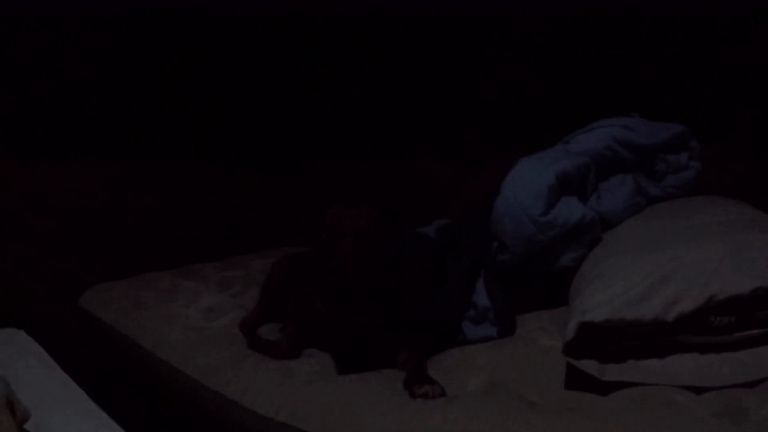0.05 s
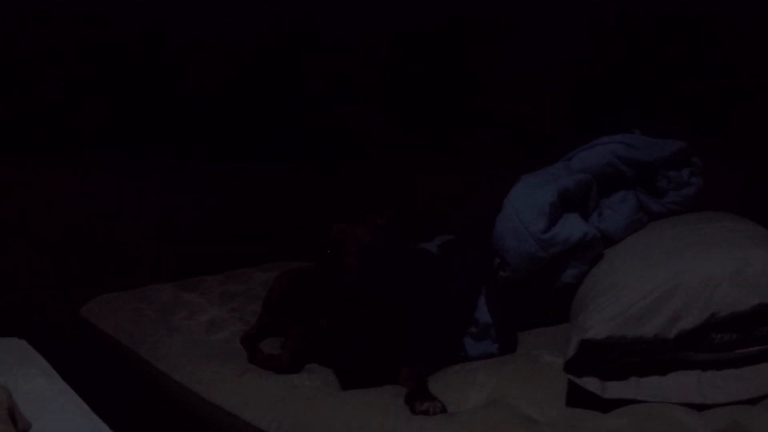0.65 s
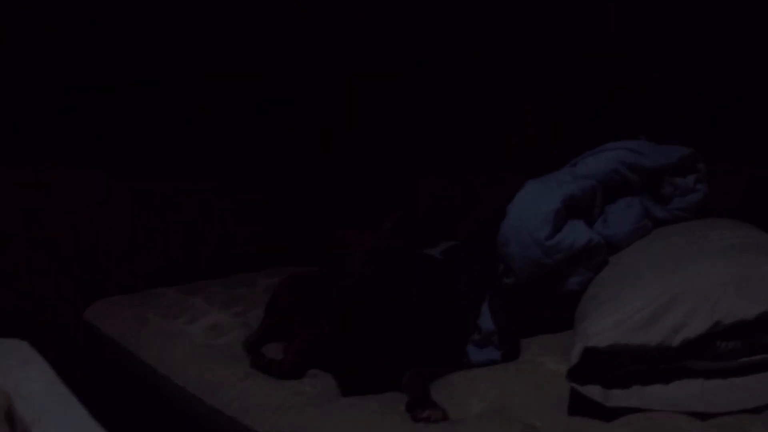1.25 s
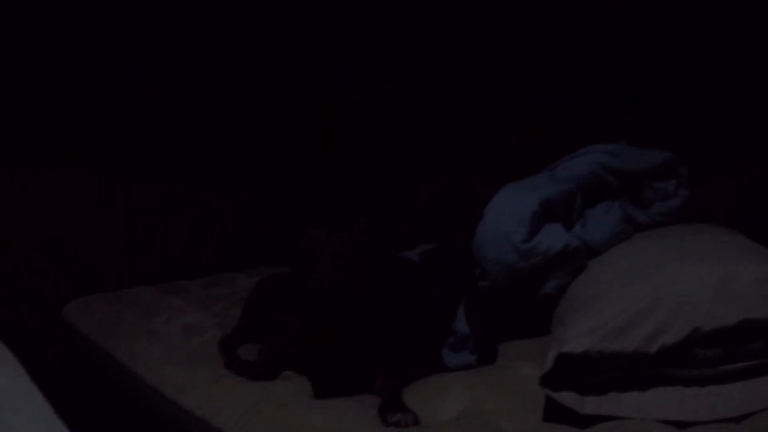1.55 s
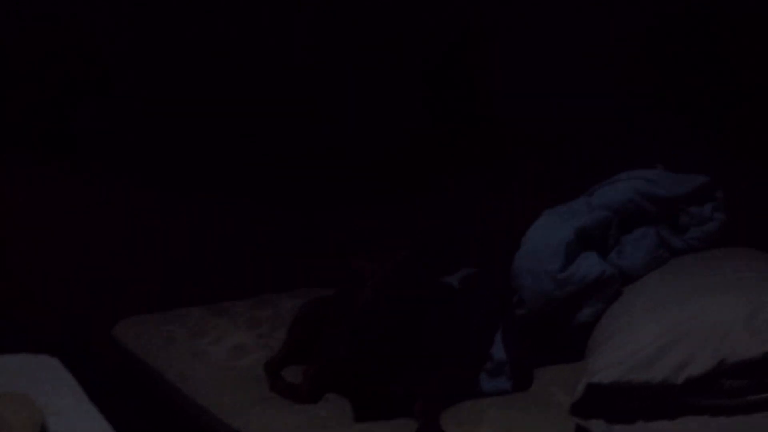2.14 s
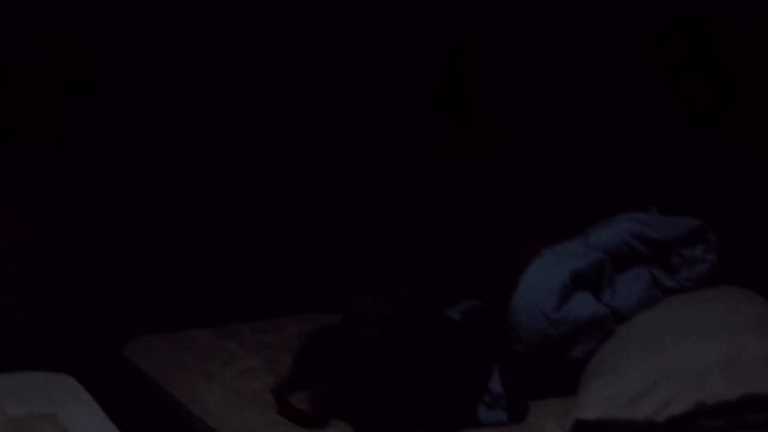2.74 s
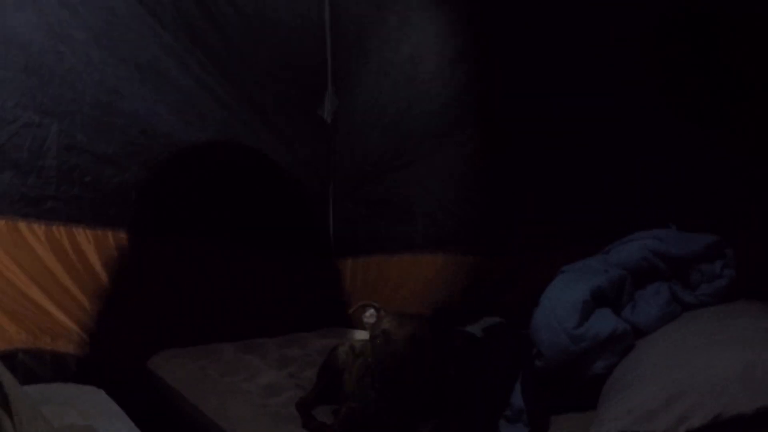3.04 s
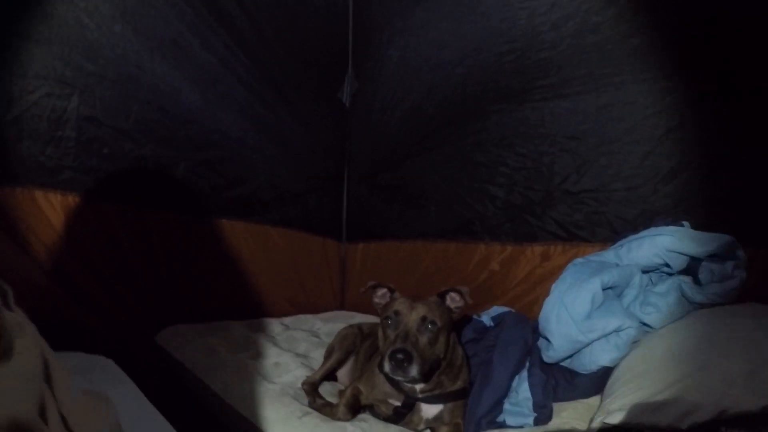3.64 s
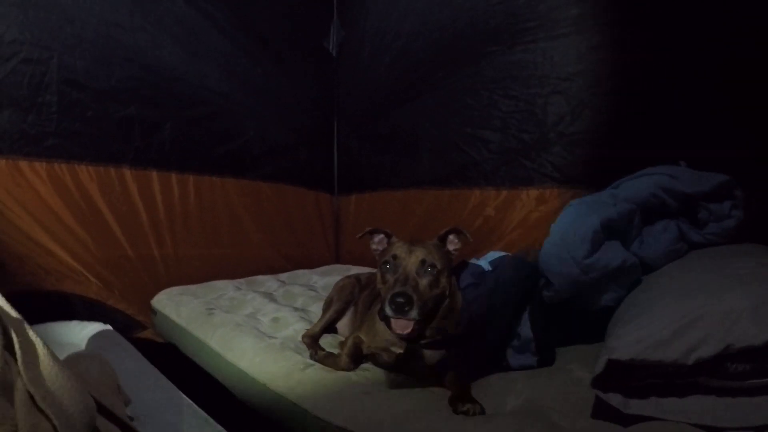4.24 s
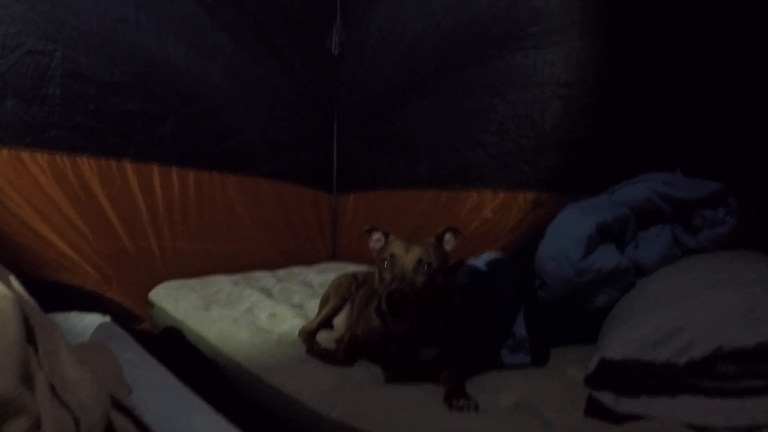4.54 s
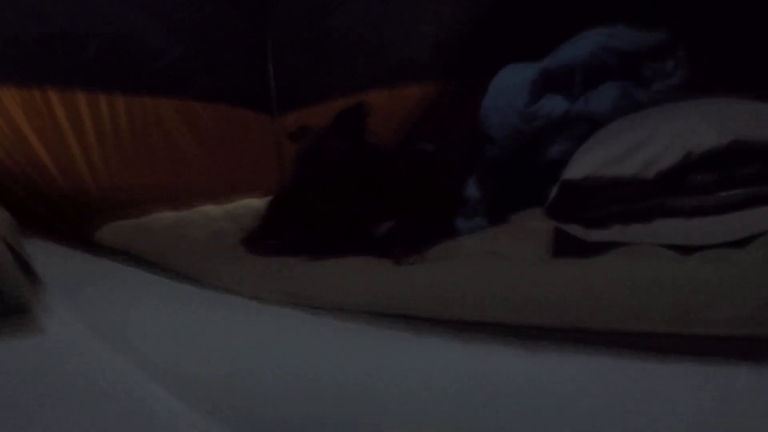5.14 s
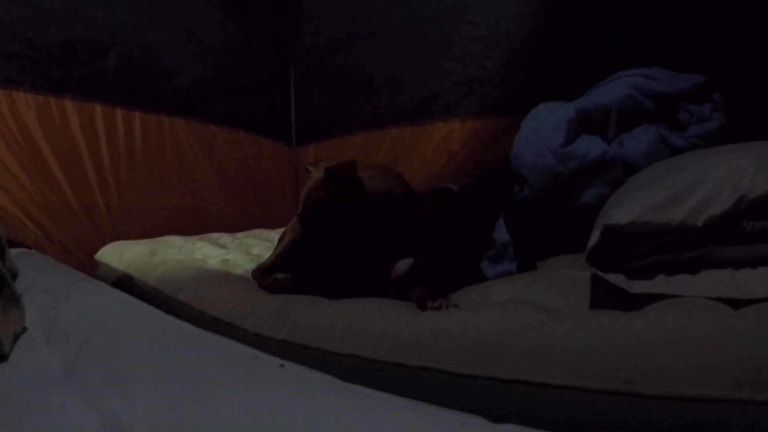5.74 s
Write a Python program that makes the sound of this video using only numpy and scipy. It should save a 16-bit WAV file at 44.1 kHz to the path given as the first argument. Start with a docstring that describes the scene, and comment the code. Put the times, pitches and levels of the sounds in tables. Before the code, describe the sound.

Inside a tent, steady rain drums on the roof, many small drops mixed with sharp, close taps from bigger ones. The cloth gives occasional dull flaps and faint swishes. In the second half the sound opens out in stereo and the microphone is shifted in the hand, giving two clusters of loud hollow knocks, scraping and low rumbling. The rain continues to the end.

```python
"""Rain drums on a tent at night, heard from inside through a hand-held microphone.
Each drop is an impact on a membrane: countless small ones patter, heavy ones smack close by, spray hisses.
The cloth flaps and swishes, and moving air rumbles underneath. In the second half the stereo image opens,
and fingers knock and creak on the microphone's case, exciting its modes by impact and stick-slip friction."""
import sys
import numpy as np
from scipy import signal
from scipy.fft import rfft, irfft
from scipy.io import wavfile
from scipy.ndimage import uniform_filter1d, minimum_filter1d

SR = 44100
rng = np.random.default_rng(int(sys.argv[2]) if len(sys.argv) > 2 else 0)


def waveform_to_disk(signal):
    """Save audio, clipped to [-1, 1], as 16-bit WAV at the path in sys.argv[1]."""
    frames = np.transpose(np.atleast_2d(signal))
    scaled = np.clip(frames, -1, 1) * 32767
    samples = np.round(scaled).astype(np.int16)
    wavfile.write(sys.argv[1], SR, samples)


N = 263718
TIME = np.arange(N) / SR


# gusts and lulls in the shower: middle t/s, duration/s, level change/dB
GUSTS = [(0.62, 0.23, 3), (1.11, 0.21, 5), (1.9, 0.33, -2.5), (2.05, 0.079, 4.5), (2.74, 0.44, -3),
         (3.245, 0.13, -6.5), (3.83, 0.28, 6.5), (3.97, 0.17, -2.5), (4.26, 0.45, 2.5), (5.6, 1, -2.5)]
# frequency response of the roof to small drops: f/Hz, level/dB
PATTER_SPECTRUM = [(60, -14.5), (150, 8), (330, 1), (450, 3), (600, 6), (850, 3), (1300, 5), (2000, 2.5),
                   (3000, 1.5), (4200, 2), (6000, -4), (8000, 1.5), (11000, 2), (15000, -16)]
def patter(drops_per_s=680, size_spread_db=9.5, even_s=0.072, hiss_db=-11, level_db=-48.5, patches=30):
    """Shot noise: small drops fall at random on patches of roof, each with its own impulse response."""
    arrivals = rng.random(N) < drops_per_s / SR
    sizes = arrivals * from_db(size_spread_db * np.clip(rng.standard_normal(N), -2, 1.1))
    local_power = np.abs(uniform_filter1d(sizes ** 2, int(even_s * SR)))
    sizes = sizes / np.sqrt(local_power + 1e-6)   # the flow of water is steady
    patch_hit = rng.integers(0, patches, N)
    out = from_db(hiss_db) * stereo_noise(N, side=1.0)
    body_db = rng.permutation(np.linspace(-15.5, 15.5, patches))
    tick_db = rng.permutation(np.linspace(-9.5, 9.5, patches))
    for k, drum_hz in enumerate(np.geomspace(280, 950, patches)):
        response = impact(crackle=0.76, rustle=0.77, crackle_s=0.0026, lag_spread=2.1,
                          push_hz=2280, snap=1, zing=2.67)
        response = response + 0.99 * resonance(response, drum_hz, q=4.54)
        response = tension_tone(response, body_db[k], tick_db[k])
        out = out + signal.oaconvolve((sizes * (patch_hit == k))[None], response, axes=-1)[:, :N]
    return coloured(out, PATTER_SPECTRUM) * from_db(level_db + swells(GUSTS))


# heavy drops: t/s, level/dB, tautness of the spot as treble tilt/dB, ring f/Hz
HEAVY_DROPS = [(0.157, -23, -9, 890.0), (0.2429, -27, -9, 980.0), (0.4767, -20, 1, 3540),
               (0.5675, -15.5, 1, 420.0), (0.6203, -14.5, -1, 520), (0.635, -17, -6, 2020),
               (0.6899, -16.5, -4.5, 440.0), (0.72, -25, -7, 560.0), (0.744, -18.5, -5.5, 840),
               (0.831, -23.5, 3, 3350.0), (0.8855, -17.5, 3, 1500.0), (0.9598, -18.5, 3, 1570.0),
               (1.016, -18, -2, 620), (1.045, -31, -5, 740.0), (1.144, -16.5, 2.5, 745),
               (1.2636, -26.5, 7, 3870.0), (1.4008, -20.5, -9, 890.0), (1.6274, -26, 5.5, 5130.0),
               (1.653, -19.5, -1, 600), (1.7087, -17, -3.5, 780.0), (1.809, -24, -9.5, 480),
               (1.8546, -23, 3, 900), (1.998, -22, -5, 420.0), (2.0314, -25, -7, 740.0),
               (2.092, -27, -10, 560), (2.135, -26.5, -8, 670.0), (2.202, -18.5, 4, 640.0),
               (2.2208, -17.5, -8.5, 1220), (2.2632, -16.5, -6.5, 562), (2.416, -24, 0, 530.0),
               (2.4786, -27, -6, 1240.0), (2.5725, -15, -6.5, 1240.0), (2.6446, -20.5, -7, 577),
               (2.7908, -35, 21.5, 6470), (2.818, -14, 2, 580.0), (2.8458, -12, 1, 1860),
               (2.9443, -32.5, 19.5, 6500.0), (3.0167, -14, -3, 530.0), (3.042, -20, 1, 480.0),
               (3.108, -20.5, 1, 740.0), (3.139, -21.5, 1, 670.0), (3.369, -15.5, -2, 530.0),
               (3.379, -22, 0, 510.0), (3.4981, -17, -3.5, 577), (3.585, -16, 0, 640.0),
               (3.596, -20, 11.5, 1080.0), (3.76, -14, 1.5, 420.0), (3.8337, -21, -4, 400.0),
               (3.879, -18, 9, 1810.0), (4.029, -11.5, 0.5, 6200), (4.1889, -20.5, 7.5, 2300.0),
               (4.2264, -19.5, 6.5, 6500.0), (4.2787, -13, -4, 6700), (4.339, -18, -2, 1900.0),
               (4.5121, -16.5, -1, 1810.0), (4.757, -22.5, 0.5, 695), (4.792, -20.5, 2, 6750),
               (4.929, -23.5, 3, 420.0), (4.9616, -16, -2, 1400), (4.979, -18.5, 0, 420.0),
               (5.024, -18.5, 3.5, 820), (5.0965, -23.5, -8, 1810.0), (5.5918, -15, 3, 420.0),
               (5.757, -30, -14.5, 637), (5.7813, -18, -7, 440.0), (5.871, -14.5, -12, 760),
               (5.9508, -24, -9, 2090)]
# frequency response of the roof to heavy drops: f/Hz, level/dB
SMACK_SPECTRUM = [(60, -59), (200, 9), (600, 7), (900, 5), (1400, 5), (2200, 4.5), (3200, 3), (4500, 4),
                  (6000, -2), (9000, 0), (15000, 0)]
def heavy_drops(level_db=4.0, delay_s=0.000814):
    """Damped resonance: big drops hit the roof right overhead, and each struck spot rings briefly."""
    out = np.zeros((2, N))
    for s, db, taut_db, hz in HEAVY_DROPS:
        hit = impact(crackle=0.74, rustle=0.82, crackle_s=0.0015, lag_spread=1.3,
                     push_hz=5140, snap=1.24, zing=1.0)
        hit = hit + 1.4 * resonance(hit, hz, q=5.2)
        hit = tension_tone(hit, body_db=-0.3 - taut_db, tick_db=-0.8 + taut_db)
        add(out, s + delay_s, from_db(db + level_db) * hit)
    return coloured(out, SMACK_SPECTRUM)


def impact(crackle, rustle, crackle_s, lag_spread, push_hz, snap, zing, rustle_s=0.014, size=5000):
    """Impulse response to one drop: a blunt push, a crackle of cloth, then spray and echoes in the tent."""
    def burst(decay_s, side):
        """Exponentially decaying noise, its energy independent of the decay time."""
        envelope = np.exp(-TIME[:size] / decay_s) * (np.arange(size) > 20)
        return np.sqrt(2 / (decay_s * SR)) * envelope * stereo_noise(size, side)

    lag = int(np.clip(round(rng.normal(0, lag_spread)), -10, 10))   # samples; direction delays one ear
    push = np.zeros((2, size))
    push[[0, 1], [10 + lag, 10 - lag]] = -1
    tail = rustle * burst(rustle_s, side=0.79)
    cloth = crackle * burst(crackle_s, side=1.0) + tail - low_pass(tail, hz=350)
    spot_hz = 1200 * 6 ** rng.random()   # each spot favours a pitch of its own
    cloth = cloth + zing * resonance(cloth, spot_hz, q=17.5)
    return snap * low_pass(push, push_hz) + cloth


def tension_tone(x, body_db, tick_db):
    """Membrane tension tilts the spectrum: slack cloth gives more body, taut cloth more tick."""
    x = x + (from_db(body_db) - 1) * low_pass(x, hz=900)
    return x + (from_db(tick_db) - 1) * (x - low_pass(x, hz=4500))


# a gust flings spray over the roof: middle t/s, duration/s, level change/dB
SPLASH = [(1.11, 0.27, 3.5)]
# spectrum of the fine spray: f/Hz, level/dB
SPRAY_SPECTRUM = [(300, -54), (2000, -10.5), (6000, 11.5), (7200, 3), (9000, 4.5), (10200, -0.5),
                  (11400, -6), (13000, -7), (15000, -18)]
def spray(openness, rain, level_db=-50, open_db=-7.0, onset_db=-44, fade_in_s=0.55):
    """Incoherent summation: droplets flung by the drops merge into a hiss following the rain's envelope."""
    early = np.maximum(1 - TIME / fade_in_s, 0)
    db = level_db + open_db * openness + onset_db * early + swells(SPLASH)
    rain_envelope = np.abs(low_pass(np.abs(rain).mean(axis=0), hz=160))
    return from_db(db) * rms_one(rain_envelope ** 0.45) * shaped_noise(SPRAY_SPECTRUM, side=0.86)


# jolts and flaps of the cloth: t/s, level/dB, f/Hz at the crest
FLAPS = [(0.258, -22.5, 179), (0.572, -22.5, 247), (1.045, -28.5, 330), (1.076, -30, 250), (1.11, -25, 339),
         (1.495, -25.5, 109), (1.529, -19.5, 320), (1.533, -13.5, 110), (1.556, -25, 300),
         (1.699, -14, 144.9), (2.269, -24, 172), (2.35, -21.5, 119), (3, -21.5, 127), (3.63, -9, 200),
         (3.749, -10, 182), (3.774, -6, 158), (3.814, -14.5, 216), (4.3806, -14, 122), (4.851, -17.5, 98),
         (4.98, -16, 143), (5.163, -6, 107), (5.248, -11, 350), (5.272, -19, 377), (5.327, -14.5, 626),
         (5.343, -21, 114), (5.472, -21.5, 234), (5.594, -10, 347), (5.823, -25.5, 188)]
def flaps(ear_lag_s=0.001):
    """Interaural delay puts the flapping cloth to one side, the further the wider the image."""
    out = np.zeros((2, N))
    for s, db, hz in FLAPS:
        width = np.interp(s, *np.transpose(IMAGE_WIDTH))
        add(out, s, from_db(db) * bump(hz, ear_lag_s * width))
    return out


def bump(hz, lag_s, rise_cycles=0.63, halving_rises=1.22, size=4000):
    """Dispersion: the high part of a flick travels fastest through cloth, so the bump falls in pitch."""
    t = np.maximum(TIME[:size] - np.array([[lag_s], [0]]), 0)
    age = t * hz / rise_cycles   # in rise times: 1 at the crest
    phase = 2 * np.pi * rise_cycles * (1 + halving_rises) * np.log1p(age / halving_rises)
    return -age * np.exp(1 - age) * np.sin(phase)


# knocks on the case: t/s, level/dB, f/Hz favoured by the struck spot
KNOCKS = [(3.63, -11, 400), (4.38, -9, 450), (4.537, -11.5, 900), (4.567, -6.5, 750), (4.628, 1.5, 1050),
          (4.648, 2, 1010), (4.6833, 5, 1110), (4.6986, 0, 1100), (4.7392, -12, 500), (4.7423, -6.5, 800),
          (5.1526, 0.5, 600), (5.1584, -1, 750), (5.162, 2.5, 1140), (5.248, -6.5, 500),
          (5.3249, -4.5, 744), (5.594, -2, 680), (5.822, -11, 396)]
# fingers rubbing the case: t/s, duration/s, level/dB, slip rate/Hz, brightness f/Hz
RUBS = [(3.734, 0.12, -23, 143, 500), (4.561, 0.095, -22, 530, 1300), (4.627, 0.051, -25, 180, 350),
        (4.683, 0.086, -21, 310, 800), (4.739, 0.096, -32, 176, 400), (4.802, 0.96, -34, 366, 806),
        (5.085, 0.11, -32, 370, 1200), (5.15, 0.0202, -10.5, 340, 1800), (5.24, 0.12, -27.5, 420, 1300),
        (5.319, 0.038, -26.5, 320, 1110)]
# resonances of the hollow in the case: f/Hz, level/dB, quality factor Q
CAVITY_MODES = [(341, -9.5, 4.5), (600, -6.5, 7.1), (1050, -12.5, 5.7), (1406, -8, 6), (1880, -7.5, 4.9)]
PRESS_S = 0.002   # a fingertip touches this long before its knock peaks
def handling(top_hz=3100, right_db=1.2, left_lag_s=0.00005):
    """Structure-borne sound: fingers shake the two ports mostly in antiphase; the hollow rings in phase."""
    shake = np.zeros((2, N))
    for s, db, spot_hz in KNOCKS:
        add(shake, s - PRESS_S, from_db(db) * knock(spot_hz))
    for s, length_s, db, slip_hz, bright_hz in RUBS:
        add(shake, s, from_db(db) * rub(length_s, slip_hz, bright_hz))
    left, right = signal.sosfilt(signal.butter(4, top_hz, fs=SR, output="sos"), shake + 1e-18)
    hollow = sum(from_db(db) * resonance((left + right) / 2, hz, q) for hz, db, q in CAVITY_MODES)
    late_left = np.interp(TIME - left_lag_s, TIME, left)
    return hollow + np.array([late_left, -from_db(right_db) * right])


def knock(spot_hz, contact_db=-1.5, ring_db=-13.0, rebound=1.15, quickness=1.11, size=3000):
    """Elastic impact: a fingertip's brief push and rebound, then the free vibration of the case."""
    from_peak_squared = (np.pi * quickness * spot_hz * (TIME[:size] - PRESS_S)) ** 2
    contact = (1 - rebound * from_peak_squared) * np.exp(-from_peak_squared)
    ringing = case(signal.unit_impulse(size, int(PRESS_S * SR)), spot_hz)
    return from_db(contact_db) * contact + from_db(ring_db) * ringing


def rub(length_s, slip_hz, bright_hz, wander_octaves=0.19, grain_db=8.0, scrape=0.99):
    """Stick-slip friction: skin drives the case with uneven slips at a wavering rate, over a dry scrape."""
    size = int(length_s * SR)
    wander = rms_one(low_pass(rng.standard_normal(size + SR), hz=90))[-size:]
    slip_count = np.floor(np.cumsum(slip_hz * 2 ** (wander_octaves * wander)) / SR)
    strength = from_db(grain_db * np.clip(rng.standard_normal(size), -2, 2))
    slips = np.diff(slip_count, prepend=0) * strength
    drive = rms_one(slips - slips.mean()) + scrape * rng.standard_normal(size)
    return rms_one(case(low_pass(drive, bright_hz), bright_hz)) * signal.windows.tukey(size, .4)


# modes of the case: f/Hz, level/dB, decay time T60/s
CASE_MODES = [(190, 2.5, 0.01), (350, -4.5, 0.018), (480, 3, 0.015), (680, -4.5, 0.013), (986, -2, 0.0057),
              (1248, 0.5, 0.0095), (2070, -3.5, 0.0071), (2730, -9.5, 0.003)]
def case(drive, spot_hz, off_spot_db=1.0, grip_octaves=0.099, uneven=0.32):
    """Modal superposition: the grip retunes the case's modes each time; the touched spot favours some."""
    out = 0
    for k, (hz, db, t60) in enumerate(CASE_MODES):
        strength = from_db(db - off_spot_db * abs(np.log2(hz / spot_hz)))
        at_ports = strength * (1 + uneven * rng.standard_normal((2, 1)))
        gripped_hz = hz * 2 ** rng.normal(0, grip_octaves)
        out = out + (-1) ** (k // 2) * at_ports * ring(drive, gripped_hz, t60)
    return out


def thuds(level_db=-9.0, hz=175, right_db=-6):
    """Rigid-body motion: every knock also shoves the whole microphone, the left port hardest."""
    out = np.zeros((2, N))
    for s, db, _ in KNOCKS:
        add(out, s, from_db(db + level_db) * bump(hz, lag_s=0.0011))
    return out * from_db([[0], [right_db]])


# shifts of the grip: t/s, level/dB, f/Hz at the crest
GRIP_SHIFTS = [(3.656, -18, 20.9), (4.375, -7, 46.7), (4.563, -4.5, 25.8), (4.639, -22, 61),
               (4.755, -9, 28.6), (4.83, -16, 24.5), (4.94, -9.5, 24.5), (5.1, -10, 27.4),
               (5.168, -6, 46.3), (5.28, -8, 36.7), (5.344, -11.5, 21)]
def heaves(level_db=-1.5):
    """Low-frequency transients: the hand heaves the microphone as it takes a new hold."""
    out = np.zeros((2, N))
    for s, db, hz in GRIP_SHIFTS:
        add(out, s, from_db(db + level_db) * bump(hz, lag_s=0.0023, size=16000))
    return out


# grunts of rubbing cloth or skin: t/s, f/Hz, half duration/s, level/dB, glide/(1/s)
CREAKS = [(0.5138, 300, 0.0045, -19.5, 33.5), (5.161, 610, 0.004, -23, 13), (5.33, 570, 0.0037, -29, 8.7)]
def creaks(rolloff_db=-6.0, harmonics=5):
    """Stick-slip oscillation: a few quick slips, each following sooner, form a rising harmonic series."""
    out = 0
    k = np.arange(1, harmonics + 1)[:, None]
    for s, hz, width_s, db, glide_per_s in CREAKS:
        t = TIME - s
        phase = 2 * np.pi * hz * t * (1 + glide_per_s * t)
        slips = np.sum(from_db(rolloff_db * (k - 1.5)) * np.cos(k * phase), axis=0)
        out = out + from_db(db) * np.exp(-(t / width_s) ** 2) * slips
    return out


def tick(s=5.593, db=-26, decay_s=0.0012, band_hz=(7000, 9400), size=2000):
    """A band-limited transient: one thin, sharp tick comes with the jolt near the end."""
    out = np.zeros((2, N))
    band = signal.butter(2, band_hz, "band", fs=SR, output="sos")
    noise = rms_one(signal.sosfilt(band, stereo_noise(size, side=0.34)))
    add(out, s, from_db(db) * np.exp(-TIME[:size] / decay_s) * noise)
    return out


# slides of the nylon: t/s, duration/s, level/dB
SWISHES = [(1.121, 0.085, -42.5), (4.212, 0.15, -42.5), (4.734, 0.1, -48.5), (5.21, 0.2, -52)]
# spectrum of sliding nylon: f/Hz, level/dB
NYLON_SPECTRUM = [(1000, -27), (3500, 12), (5500, 8), (7400, 5.5), (8500, -2), (11000, -24), (15000, -18)]
def swishes():
    """Friction noise: smooth nylon slides over itself, louder with speed."""
    speed = np.zeros(N)
    for s, length_s, db in SWISHES:
        add(speed, s, from_db(db) * signal.windows.tukey(int(length_s * SR), .6))
    return speed * shaped_noise(NYLON_SPECTRUM, side=0.41)


# moving air: t/s, rumble level/dB, billow level/dB
AIR_LEVELS = [(0.25, -39.5, -38.5), (1.15, -34, -34.5), (1.7, -31.5, -30), (2.7, -31, -37),
              (3.25, -31.5, -41), (4.7, -16.5, -37), (5.35, -18.5, -34), (5.68, -32, -31.5),
              (5.98, -36.5, -33.5)]
# sways of the hand that push air at the microphone: middle t/s, duration/s, level/dB
SWAYS = [(1.51, 0.049, -20), (3.027, 0.16, -21.5), (3.428, 0.37, -24), (3.677, 0.41, -16),
         (3.91, 0.42, -18), (4.647, 0.37, -14), (5.176, 0.3, -11), (5.613, 0.11, -21.5)]
# spectra of the rumble and of the billowing walls: f/Hz, level/dB
RUMBLE_SPECTRUM = [(10, -1.5), (22, 7.5), (42, 3), (65, -8.5), (100, -21), (180, -33.5), (400, -63),
                   (2000, -149), (15000, -140)]
BILLOW_SPECTRUM = [(30, -46), (70, 5), (115, 0.5), (170, -3), (260, -9), (400, -18.5), (800, -35.5),
                   (3000, -60), (15000, -115)]
def air(sway_billow_db=-19):
    """Pressure fluctuations rumble at the microphone and the walls boom softly; sways add power to both."""
    rumble_db, billow_db = in_time(AIR_LEVELS)
    sway = swells([(s, length_s, from_db(db)) for s, length_s, db in SWAYS])
    rumble = np.hypot(from_db(rumble_db), sway)
    billow = np.hypot(from_db(billow_db), from_db(sway_billow_db) * sway)
    pressure = rumble * shaped_noise(RUMBLE_SPECTRUM, side=0.15)
    walls = billow * shaped_noise(BILLOW_SPECTRUM, side=0.53)
    return pressure + walls


def from_db(db):
    """Decibels to amplitude ratio."""
    return 10 ** (np.asarray(db) / 20)


def rms_one(x):
    """Normalisation to unit rms."""
    return x / np.sqrt(np.mean(x ** 2) + 1e-20)


def in_time(rows):
    """Linear interpolation of each column of a curve at every sample."""
    s, *columns = np.transpose(rows)
    return [np.interp(TIME, s, column) for column in columns]


def swells(rows):
    """Raised-cosine pulses, one for each (middle t/s, duration/s, height)."""
    return sum(height * np.cos(np.pi * np.clip((TIME - s) / length_s, -.5, .5)) ** 2
               for s, length_s, height in rows)


def add(out, s, sound):
    """Superposition: mix a short sound in at time s."""
    start = int(np.clip(round(s * SR), 0, N - 1))
    out[..., start:start + sound.shape[-1]] += sound[..., :N - start]


def stereo_noise(size, side):
    """Partly correlated white noise; side is the strength of what differs between the ears."""
    common, apart = rng.standard_normal((2, size))
    return common + side * apart * np.array([[1], [-1]])


def shaped_noise(spectrum, side):
    """Stationary stereo noise with the given spectrum and unit rms."""
    return rms_one(coloured(stereo_noise(N, side), spectrum))


def coloured(x, spectrum, size=8192):
    """Minimum-phase filter with the given spectrum, made causal by folding the cepstrum."""
    hz, db = np.transpose(spectrum)
    grid_hz = np.maximum(np.arange(size // 2 + 1) * SR / size, 1)
    gain = from_db(np.interp(np.log(grid_hz), np.log(hz), db))
    cepstrum = irfft(np.log(gain))
    cepstrum[1:size // 2] *= 2
    cepstrum[size // 2 + 1:] = 0
    response = irfft(np.exp(rfft(cepstrum)))
    return signal.oaconvolve(x, response[None], axes=-1)[:, :x.shape[-1]]


def low_pass(x, hz):
    """First-order low-pass."""
    return signal.lfilter(*signal.butter(1, hz, fs=SR), x)


def resonance(x, hz, q):
    """Second-order resonator with gain 1 at its peak."""
    return signal.lfilter(*signal.iirpeak(hz, q, fs=SR), x)


def ring(x, hz, t60):
    """Damped oscillator: a unit impulse sets a sine of height 1 ringing."""
    radius, angle = from_db(-60 / (t60 * SR)), 2 * np.pi * hz / SR
    return signal.lfilter([0, np.sin(angle)], [1, -2 * radius * np.cos(angle), radius ** 2], x + 1e-18)


def limited(x, ceiling_db=1.0, release_db_per_s=45, size=90):
    """Peak limiting: the loudest knocks turn the gain down at once, and it takes a moment to recover."""
    over_db = np.maximum(20 * np.log10(np.abs(x).max(axis=0) + 1e-9) - ceiling_db, 0)
    recovery = release_db_per_s * TIME
    held_db = np.maximum.accumulate(over_db + recovery) - recovery
    return x * from_db(uniform_filter1d(minimum_filter1d(-held_db, size), size))


# width of the stereo image: t/s, share (0-1)
IMAGE_WIDTH = [(2.4, 0), (2.95, 0.58), (3.5, 1), (5.4, 0.85), (5.98, 0.05)]
# how far the upper treble is open: t/s, share (0-1)
TREBLE_OPENNESS = [(2.7, 0.08), (2.8, 0.71), (3.5, 0.77), (5.35, 0.83), (5.5, 0.55), (5.62, 0.57),
                   (5.98, 0.18)]
# response to the rain with the treble narrow and with it open: f/Hz, level/dB
TREBLE_NARROW = [(3000, 4), (6200, 8.5), (7100, -3), (8000, -19.5), (9000, -21.5), (11200, -42),
                 (13000, -39), (15000, -34)]
TREBLE_OPEN = [(3000, 1.5), (4600, 1), (6200, 12), (7700, 2), (8300, -6), (10000, -10.5), (11200, -16),
               (12500, -11), (15000, -26)]
def scene(treble_side=0.12, apart_hz=4500):
    """Superposition of all sources; mid-side scaling opens the image while the treble reaches higher."""
    width, openness = in_time(IMAGE_WIDTH)[0], in_time(TREBLE_OPENNESS)[0]
    rain = patter() + heavy_drops()
    rain = (1 - openness) * coloured(rain, TREBLE_NARROW) + openness * coloured(rain, TREBLE_OPEN)
    side = rain - rain.mean(axis=0)
    rain = rain + treble_side * (side - low_pass(side, apart_hz))   # short waves differ most between ears
    tent = rain + spray(openness, rain) + swishes() + flaps() + creaks() + air()
    mix = tent + handling() + thuds() + heaves() + tick()
    centre = mix.mean(axis=0)
    return centre + width * (mix - centre)


def record(dry, silent_s=0.094, fade_in_s=0.12, cutoff_hz=15300):
    """Peak and band limiting: the sound fades in, a limiter catches the peaks, the top is cut."""
    fade = 1 - np.exp(-np.maximum(TIME - silent_s, 0) / fade_in_s)
    top_cut = signal.ellip(10, .1, 90, cutoff_hz, fs=SR, output="sos")
    return signal.sosfilt(top_cut, limited(fade * dry))


dry = scene()
out = record(dry)
waveform_to_disk(out)
```